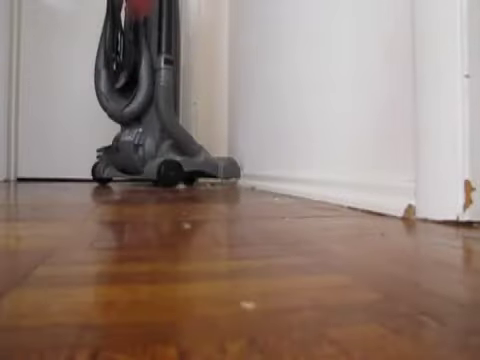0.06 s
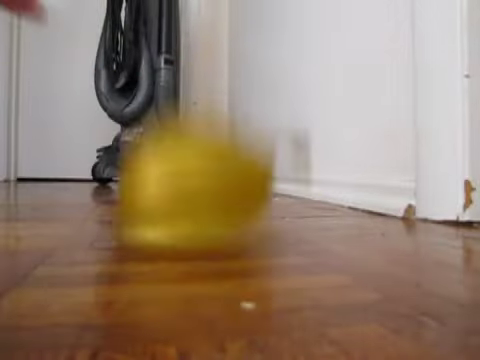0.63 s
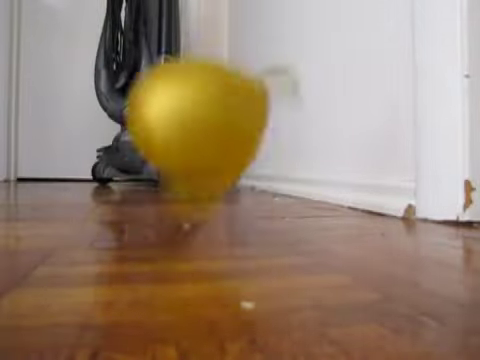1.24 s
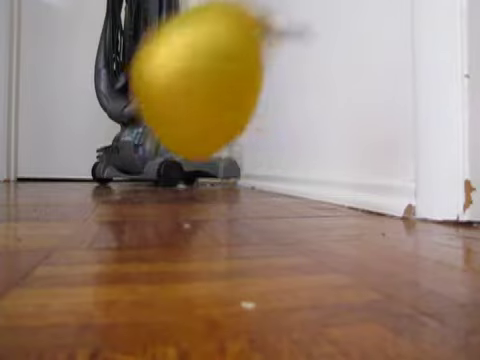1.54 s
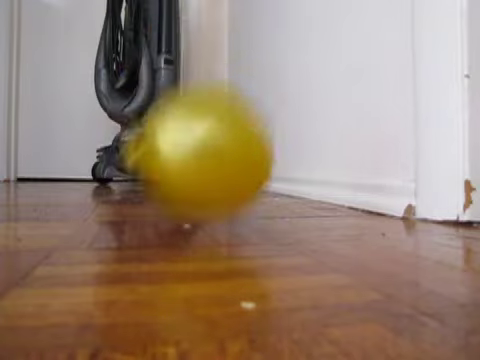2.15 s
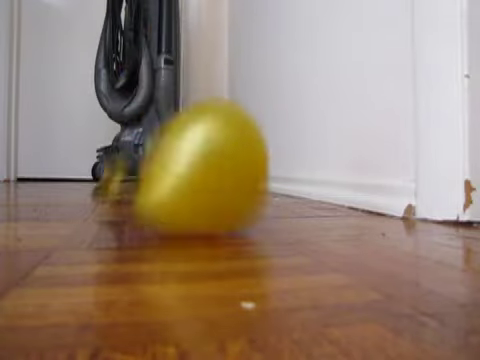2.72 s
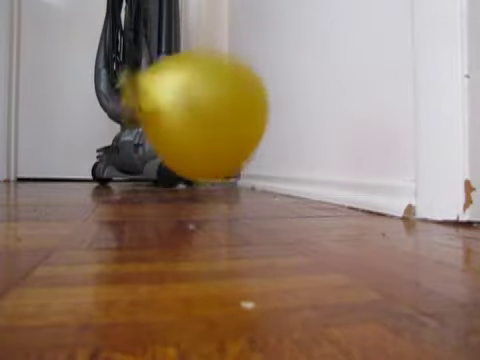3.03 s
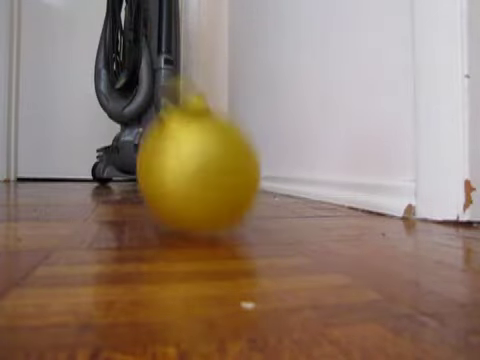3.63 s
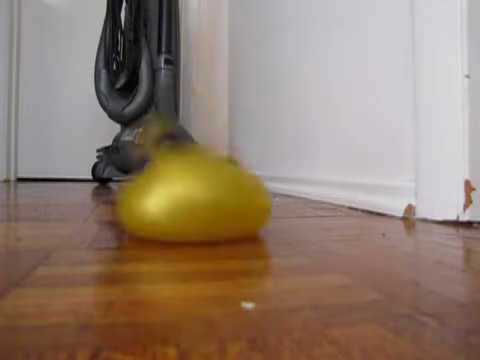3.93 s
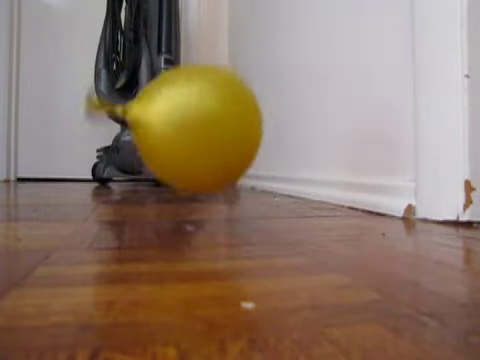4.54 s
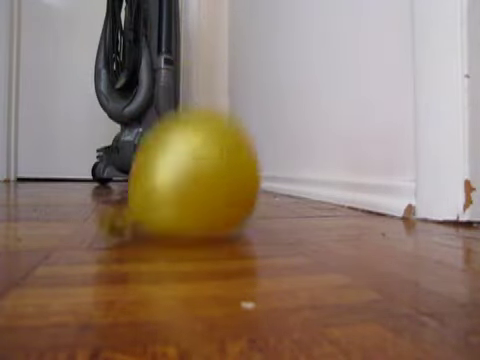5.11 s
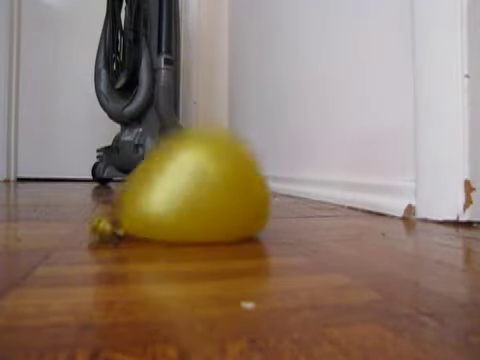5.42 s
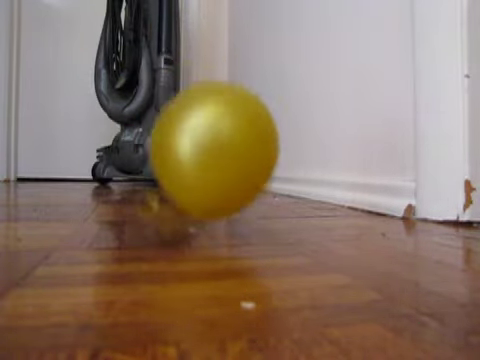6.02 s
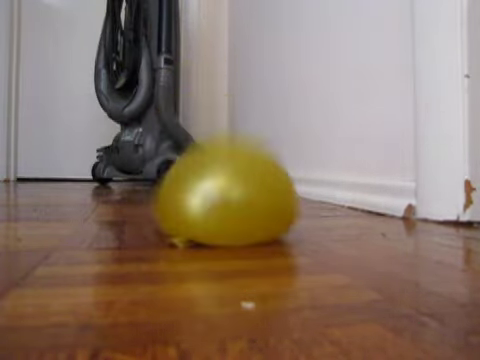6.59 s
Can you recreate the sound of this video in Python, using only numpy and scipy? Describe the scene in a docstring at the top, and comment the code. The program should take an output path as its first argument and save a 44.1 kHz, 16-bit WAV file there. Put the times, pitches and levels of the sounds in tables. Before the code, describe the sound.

After a brief soft hiss, a water balloon hits a wooden floor with a loud rubbery slap, slowed down so it sounds deep and drawn out. The water booms, churns and gurgles, swelling and then fading. Four more bounces follow, generally softer each time, with bubbles gulping and drops ticking against the skin in between. The sound is close and dull, in a bare, echoing room with a faint low rumble.

```python
"""A water balloon bounces five times on a wooden floor, in slow motion: deep and drawn out.
Each landing is a rubber slap and a falling gurgle of trapped air. The water booms on the boards,
churns and throws spray, swelling until the balloon is flattest, then fading. In the air, bubbles
gulp and drops tick against the skin. A bare room answers, over a faint low rumble;
a brief soft hiss opens the scene."""
import sys
import numpy as np
from scipy import signal
from scipy.fft import rfft, irfft, next_fast_len
from scipy.io import wavfile
from scipy.ndimage import uniform_filter1d, map_coordinates

SR = 44100
rng = np.random.default_rng(int(sys.argv[2]) if len(sys.argv) > 2 else 0)


def persist_wave(psi):
    """Save psi, clipped to +-1, as 16-bit WAV."""
    counts = np.round(np.clip(psi, -1, 1) * 32767).astype(np.int16)
    wavfile.write(sys.argv[1], SR, np.atleast_2d(counts).T)


N = 298116
TIME_S = np.arange(N) / SR


def amp(db):
    return 10 ** (np.asarray(db) / 20)


def unit_rms(x):
    return x / np.sqrt(np.mean(x ** 2) + 1e-20)


def along(points, hz):
    """Interpolate (Hz, value) points on a log frequency axis."""
    knots_hz, values = np.transpose(points)
    return np.interp(np.log(hz + 1), np.log(knots_hz + 1), values)


def filtered(x, response):
    """Apply the frequency response response(hz)."""
    size = next_fast_len(x.shape[-1] + SR // 4)
    return irfft(rfft(x, size) * response(np.fft.rfftfreq(size, 1 / SR)), size)[..., :x.shape[-1]]


def add(track, start_s, sound):
    """Mix a sound into a track."""
    part = track[..., max(round(start_s * SR), 0):][..., :sound.shape[-1]]
    part += sound[..., :part.shape[-1]]


def noise(size=N):
    """Two independent white noises."""
    return rng.standard_normal((2, size))


def wobble(rate_hz, size=N):
    """Smooth random curve, rate_hz knots a second."""
    knots = rng.standard_normal(int(size * rate_hz / SR) + 4)
    return map_coordinates(knots, [np.arange(size) * rate_hz / SR])


def swell(t, peak_s):
    """Rounded rise to 1 at peak_s, then exponential fall."""
    return (t / peak_s * np.exp(1 - t / peak_s)) ** 2


def grains(rate_hz, spread_db, wash_db):
    """Tiny impacts of uneven size on a smooth wash."""
    sizes = amp(spread_db * np.clip(rng.standard_normal(N), -2, 2))
    struck = rng.random(N) < rate_hz / SR
    return unit_rms(sizes * struck * noise()) + amp(wash_db) * noise()


def steadied(x, window_s):
    """Even out slow swells."""
    power = uniform_filter1d(np.mean(x ** 2, 0), int(window_s * SR))
    return x / np.sqrt(np.abs(power) + 1e-9)


# Left-right likeness: (frequency [Hz], correlation [0..1])
COHERENCE = [(50, 0.85), (125, 0.88), (250, 0.99), (500, .5), (1000, 0.36), (3000, 0.24)]
def coloured(pair, spectrum):
    """Shape two independent signals into stereo of rms 1, alike in the bass."""
    def response(hz):
        angle = np.arccos(np.clip(along(COHERENCE, hz), -1, 1)) / 2
        return amp(along(spectrum, hz)) * [np.cos(angle), np.sin(angle)]
    mid, side = filtered(pair, response)
    return unit_rms(np.array([mid + side, mid - side]))


# Hiss spectrum: (frequency [Hz], relative density [dB])
HISS_SPECTRUM = [(100, 2), (250, 18), (450, 15), (900, -10), (2500, -3.5), (5500, -2), (9000, -5),
                 (15000, -12.5)]
# Hiss envelope: (time [s], level [dB])
HISS_ENVELOPE = [(0, -55), (.055, -44), (.095, -48), (.11, -53), (.165, -53.5), (.19, -120)]
def hiss():
    """Soft bright hiss, over before the first landing."""
    level_db = np.interp(TIME_S, *np.transpose(HISS_ENVELOPE))
    return amp(level_db) * coloured(noise(), HISS_SPECTRUM)


def rumble():
    """The room's own faint low rumble."""
    spectrum_hz_db = [(15, -12.0), (33, 6.5), (55, -11.5), (85, 4.0), (130, -4.5), (250, -35.5)]
    return amp(-51.5) * coloured(noise(), spectrum_hz_db)


def bubble(start_hz, end_hz, glide_s, unrest):
    """Air rings briefly and glides; pitch and strength tremble as the water squeezes it."""
    t = np.arange(int(3 * glide_s * SR)) / SR
    hz = start_hz * (end_hz / start_hz) ** np.minimum(t / glide_s, 1)
    hz *= 1 + unrest * wobble(start_hz / 3, len(t))
    tremble = 1 + 6 * unrest * wobble(start_hz / 1.4, len(t))
    return tremble * swell(t, 0.27 * glide_s) * np.sin(2 * np.pi * np.cumsum(hz) / SR)


# Largest air pockets, in the water and under the skin:
# (time [s], level [dB], start pitch [Hz], glide [s])
AIR_POCKETS = [(0.202, -33.5, 142, 0.027), (.625, -16, 144, 0.031), (0.644, -12, 594, 0.015),
               (.6783, -4, 485, 0.012), (0.683, -9.5, 345, .017), (0.756, -9, 412, 0.012),
               (1.037, -24, 211.6, 0.05), (1.165, -32.5, 160, 0.09), (1.26, -30, 583, 0.034),
               (1.541, -26, 400, 0.024), (1.628, -32.5, 187.6, 0.073), (1.709, -33.5, 886, 0.02),
               (1.753, -24, 607, 0.0084), (1.755, -28.5, 230, 0.057), (1.891, -24, 389, 0.024),
               (1.892, -34, 169, .1), (2.133, -17.5, 501, 0.014), (2.148, -16, 610, .009),
               (2.156, -21, 858, 0.015), (2.3795, -10, 453, 0.012), (2.385, -7.5, 134.5, 0.02),
               (2.907, -31, 1006, 0.037), (3.387, -39, 336, 0.071), (3.805, -19.5, 617, 0.011),
               (4.342, -24.5, 313, 0.007), (4.812, -28.5, 518, 0.007), (5.711, -28, 1130, 0.013),
               (6.226, -35, 535, .021), (6.286, -34, 383.5, 0.12), (6.354, -32.5, 685, .017)]
def gulps(pockets, steady_hz=1010, sag_per_octave=0.12):
    """Large air pockets ring right of centre; the deeper they are, the more their pitch sags."""
    out = np.zeros(N)
    for start_s, db, hz, glide_s in pockets:
        end_hz = hz * (1 - sag_per_octave * np.log2(steady_hz / hz))
        add(out, start_s, amp(db) * bubble(hz, end_hz, glide_s, unrest=0.056))
    return out * amp([[-1.1], [1.1]])


# Room decay: (frequency [Hz], T60 [s])
ROOM_T60 = [(60, 0.73), (300, 1.3), (1200, 1.18), (3500, 0.79)]
def room(x):
    """Bare walls answer late and long, differently at each ear."""
    hz, t, spectra = signal.stft(noise(SR + SR // 2), SR, nperseg=256)
    decay = amp(-60 * t / along(ROOM_T60, hz)[:, None])
    onset = 1 - np.exp(-t / 0.0045)
    _, tail = signal.istft(spectra * decay * onset, SR, nperseg=256)
    return signal.fftconvolve(x, tail / np.linalg.norm(tail[0]), axes=1)[:, :N]


# Splash and droplet spectrum: (frequency [Hz], relative density [dB])
SPATTER_SPECTRUM = [(100, 1), (400, 0.5), (1200, -2), (2200, -5), (3200, -13.5), (4000, -32.5)]
# Skin meets floor:
# (time [s], slap [dB], slap pitch [Hz], splash [dB], thump [dB], left-right [dB], boom jolt [dB])
TOUCHDOWNS = [(0.524, 2.5, 1212, -10.5, -21, 0.5, -15), (2.1155, -18.5, 1500, -24, -24, -0.5, -26.5),
              (3.553, -28, 1204, -27.5, -31, -1, -26.5), (4.863, -24, 844, -26.5, -43, -1, -29),
              (6.037, -23, 878, -29.5, -29, -1.5, -31.5)]
def landings():
    """A slap of squeezed air, a splash as the skin spreads, a low push into the boards."""
    out, t = np.zeros((2, N)), np.arange(SR // 5) / SR
    for touch_s, slap_db, hz, splash_db, thump_db, pan_db, _ in TOUCHDOWNS:
        slap = amp(slap_db) * swell(t, 0.00066) * np.sin(2 * np.pi * hz * t)
        splash = amp(splash_db) * np.sqrt(swell(t, 0.0027)) * coloured(noise(len(t)), SPATTER_SPECTRUM)
        thump = amp(thump_db) * swell(t, 0.008) * np.sin(2 * np.pi * 125 * t)
        add(out, touch_s, (slap + splash + thump) * amp([[pan_db / 2], [-pan_db / 2]]))
    return out


# Bright snaps: (time [s], level [dB], cutoff [Hz])
BRIGHT_SNAPS = [(0.5242, -26, 6960), (0.758, -26, 7880), (2.985, -48, 3180), (3.066, -45, 3000),
                (3.927, -44, 3030)]
def snaps():
    """Very short bright snaps: overload crackle on the two loudest hits, plus three faint high ticks."""
    out, t = np.zeros((2, N)), np.arange(SR // 50) / SR
    for start_s, db, cutoff_hz in BRIGHT_SNAPS:
        burst = filtered(noise(len(t)), lambda hz: 1 / (1 + (hz / cutoff_hz) ** 4))
        add(out, start_s, amp(db) * swell(t, 0.00045) * unit_rms(burst))
    return out


# Balloon at its flattest: (time [s], boom [dB], churn [dB], spray [dB], lingering slosh base [dB])
SQUASH_PEAKS = [(0.735, -15, -21, -28.5, -35), (2.404, -15.5, -24, -34, -40.5),
                (3.787, -19, -27.5, -35.5, -47), (5.134, -23.5, -29.5, -42, -48.5),
                (6.3, -22, -38, -51, -44)]
def water_gains():
    """Each bounce drives boom, churn and spray; the boom hardly lingers in the air."""
    _, boom_db, churn_db, spray_db, _ = np.transpose(SQUASH_PEAKS)
    boom_gain = bounce_gain(boom_db, jolts_db=np.transpose(TOUCHDOWNS)[-1],
                            rise_db_per_s=150, fall_db_per_s=62, linger_trim_db=-25, rest_db=-49)
    churn_gain = bounce_gain(churn_db, jolts_db=churn_db - 7.5, lead_s=0.019,
                             rise_db_per_s=74, fall_db_per_s=54, linger_trim_db=-2, rest_db=-55.5)
    spray_gain = bounce_gain(spray_db, jolts_db=spray_db - 12,
                             rise_db_per_s=94, fall_db_per_s=60, linger_trim_db=-8.5, rest_db=-61)
    return boom_gain, churn_gain, spray_gain


def bounce_gain(peaks_db, jolts_db, rise_db_per_s, fall_db_per_s, linger_trim_db, rest_db, lead_s=0):
    """A jolt at the touch, a swell peaking lead_s before the squash, a fall, then slosh in the air."""
    grip_s, calm_s = 0.045, 1.25  # for the water to feel the floor; to settle in the air
    power = amp(rest_db) ** 2
    bounces = zip(TOUCHDOWNS, SQUASH_PEAKS, jolts_db, peaks_db)
    for (touch_s, *_), (squash_s, *_, linger_db), jolt_db, peak_db in bounces:
        since_touch_s = np.maximum(TIME_S - touch_s, 0)
        since_peak_s = TIME_S - squash_s + lead_s
        jolt_fall_db = jolt_db - fall_db_per_s * since_touch_s
        swell_db = peak_db + np.minimum(rise_db_per_s * since_peak_s, -fall_db_per_s * since_peak_s)
        push = np.minimum(since_touch_s / grip_s, 1) * amp(np.maximum(jolt_fall_db, swell_db))
        settling = (since_peak_s > 0) * np.exp(-(since_peak_s / calm_s) ** 2)
        linger = amp(linger_db + linger_trim_db) * settling
        power = power + push ** 2 + linger ** 2
    return np.sqrt(power)


# Modes of floor and water mass: (frequency [Hz], width [Hz], relative level [dB])
BOOM_MODES = [(25.6, 11, -8), (54.4, 7.8, -3), (100.1, 60, -9.5)]
def boom():
    """Low resonances, kept ringing by the heaving water, drift in strength and phase."""
    out = np.zeros(N)
    for hz, width_hz, db in BOOM_MODES:
        strength = amp(db + 3.2 * wobble(rate_hz=10))
        out += strength * np.sin(2 * np.pi * hz * TIME_S + 1.84 * wobble(width_hz))
    return unit_rms(out)


def plips(centre_hz, octaves, cycles, spread_db, count):
    """Small bubbles of random pitch, strength and side, the low ones louder; rms 1."""
    out = np.zeros((2, N))
    starts_s = rng.random(count) * N / SR
    for start_s, (pitch, strength, side) in zip(starts_s, rng.uniform(-1.013, 1, (count, 3))):
        hz = centre_hz * 2 ** (octaves * pitch)
        db = spread_db * strength - 3 * pitch
        pan_db = side * np.array([[1.1], [-1.1]])
        add(out, start_s, amp(db + pan_db) * bubble(hz, 0.912 * hz, cycles / hz, unrest=0.0094))
    return unit_rms(out)


# Churn spectrum: (frequency [Hz], relative density [dB])
CHURN_SPECTRUM = [(30, -22.5), (70, -5), (110, -7), (145, -1), (210, -4), (340, -0.5), (430, -1.5),
                  (600, -7.5), (850, -7.5), (1200, -22), (2500, -52)]
def churn():
    """The water mass churns and carries small bubbles, slightly right of centre."""
    wash = coloured(grains(rate_hz=300, spread_db=1, wash_db=0), CHURN_SPECTRUM)
    bubbles = plips(centre_hz=333, octaves=1.216, cycles=10.7, spread_db=5, count=200)
    return (steadied(wash, window_s=0.24) + amp(-6.5) * bubbles) * amp([[-0.4], [0.4]])


# Spray spectrum: (frequency [Hz], relative density [dB])
SPRAY_SPECTRUM = [(400, -52), (800, -2), (1100, 6.5), (1500, 2.5), (2000, -4), (2700, -9.5), (3400, -20),
                  (4000, -34.5)]
def spray():
    """Spray patters against the skin and carries tiny bubbles."""
    patter = coloured(grains(rate_hz=140, spread_db=2.5, wash_db=1), SPRAY_SPECTRUM)
    bubbles = plips(centre_hz=1356, octaves=0.8, cycles=20, spread_db=3.5, count=190)
    return steadied(patter, window_s=0.2) + amp(-5.5) * bubbles


# Gurgle per landing: (delay after touch [s], level re churn [dB], start pitch [Hz], glide [s])
GURGLE_STEPS = [(0.089, -3.5, 508.6, 0.032), (0.141, 3.5, 161.3, 0.042)]
def gurgles():
    """Air trapped under the spreading skin gurgles downward in two steps."""
    return gulps([(touch_s + delay_s, churn_db + db, hz, glide_s)
                  for (touch_s, *_), (_, _, churn_db, *_) in zip(TOUCHDOWNS, SQUASH_PEAKS)
                  for delay_s, db, hz, glide_s in GURGLE_STEPS])


# Clearest flicks of drops, folds and knot on the skin:
# (time [s], level [dB], pitch [Hz], spatter re level [dB])
SKIN_FLICKS = [(0.644, -8.5, 956, -9), (0.65, -11.5, 940, -8), (0.746, -10.5, 923, 0.5),
               (0.755, -4.5, 930, -12), (0.817, -18, 930, -1.5), (0.858, -17, 1076, -23.5),
               (1.007, -24.5, 1310, -24), (1.297, -22, 851, -18), (1.327, -26.5, 1166, -22.5),
               (1.393, -17, 1210, -3), (1.5, -19, 923, -11), (1.657, -23, 1170, -14), (1.994, -39, 964, -2),
               (2.157, -16, 850, -13), (2.343, -28.5, 1366, -5), (2.7, -21.5, 1510, -19),
               (2.795, -20, 1250, -11), (2.851, -33, 1300, -1.5), (2.913, -20, 1180, -9),
               (2.984, -27, 937, -3.5), (3.048, -25.5, 1090, -2), (3.056, -23, 1150, -5),
               (3.198, -31, 1820, -17), (3.673, -25, 1520, -19.5), (3.724, -15.5, 920, -22.5),
               (3.735, -12, 1045, -19.5), (3.766, -12, 840, -11.5), (3.773, -18, 851, -3.5),
               (3.928, -26.5, 1420, 1), (4.344, -27.5, 1010, -28.5), (4.509, -29.5, 1356, -7),
               (4.578, -32, 1160, -22), (4.714, -35.5, 1240, -2), (4.886, -31, 1340, -4.5),
               (5.349, -29, 1140, -23), (5.639, -33, 1050, -5), (5.931, -26, 1023, -5.5),
               (5.963, -27, 1304, -0.5), (6.465, -25.5, 1500, -4), (6.525, -17.5, 1480, -10),
               (6.642, -33.5, 940, -2.5)]
def ticks(flicks, gather_db=-12.5, gather_s=0.013, scatter_t60_s=0.052):
    """A fold rustles as it gathers, its flick rings the damped skin, scattered droplets follow."""
    out, t = np.zeros((2, N)), np.arange(-SR // 20, SR // 10) / SR
    after_s = np.maximum(t, 0)
    gather = amp(gather_db) * np.exp(-np.abs(t) / gather_s)
    scatter = amp(-60 * after_s / scatter_t60_s) * (1 - np.exp(-after_s / 0.00034))
    for flick_s, db, hz, spatter_db in flicks:
        ring = swell(after_s, 0.84 / hz) * np.sin(2 * np.pi * hz * after_s)
        spatter = np.maximum(gather, scatter) * coloured(noise(len(t)), SPATTER_SPECTRUM)
        add(out, flick_s + t[0], amp(db) * (ring + amp(spatter_db) * spatter))
    return out


def stray_ticks(spray_gain, count=80, over_spray_db=5, spread_db=6,
                centre_hz=1200, octaves=0.35, spatter_db=-6.5):
    """Lesser random flicks from the first landing on, as strong as the spray allows."""
    jitter, strength, pitch = rng.random((count, 3)).T
    first_s = TOUCHDOWNS[0][0]
    times_s = first_s + (N / SR - first_s) * (np.arange(count) + jitter) / count
    spray_db = 20 * np.log10(spray_gain[(times_s * SR).astype(int)])
    db = spray_db + over_spray_db + spread_db * (2 * strength - 1)
    hz = centre_hz * 2 ** (octaves * (2 * pitch - 1))
    return ticks([(*row, spatter_db) for row in zip(times_s, db, hz)])


def scene(left_delay_s=5e-5, overload=0.9, slow_top_hz=3750):
    """The balloon is nearer the right ear; slow motion strips the treble, except snaps and hiss."""
    boom_gain, churn_gain, spray_gain = water_gains()
    lumps = amp(1.5 * wobble(rate_hz=45))  # the water moves unevenly
    water = lumps * (churn_gain * churn() + spray_gain * spray()) + boom_gain * boom()
    hits = landings() + ticks(SKIN_FLICKS) + stray_ticks(spray_gain)
    bubbles = gulps(AIR_POCKETS) + gurgles()
    reverb = room(amp(-9) * hits + amp(-11.5) * bubbles)
    mix = hits + bubbles + water + reverb + rumble()
    mix = filtered(mix, lambda hz: np.exp(-2j * np.pi * hz * np.array([[left_delay_s], [0]])))
    rounded = mix / (1 + np.abs(mix / overload) ** 6) ** (1 / 6)  # hard peaks overload the microphone
    dulled = filtered(rounded, lambda hz: 1 / np.sqrt(1 + (hz / slow_top_hz) ** 60))
    return dulled + snaps() + hiss() + amp(-101) * noise()


def record(dry):
    """Band limit: nothing passes above top_hz."""
    top_hz = 15700
    return filtered(dry, lambda hz: hz < top_hz)


dry = scene()
out = record(dry)
persist_wave(out)
```